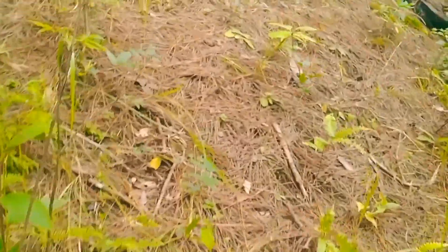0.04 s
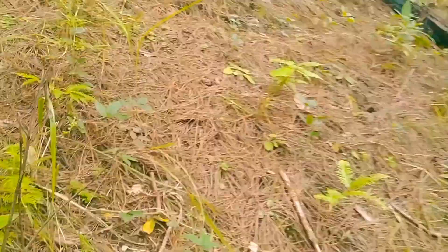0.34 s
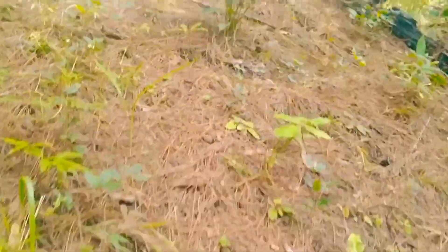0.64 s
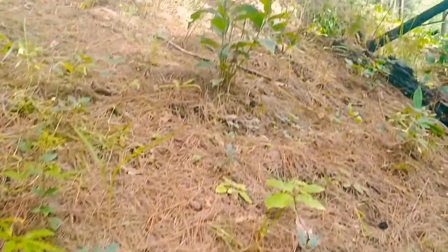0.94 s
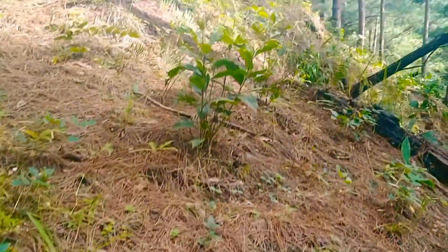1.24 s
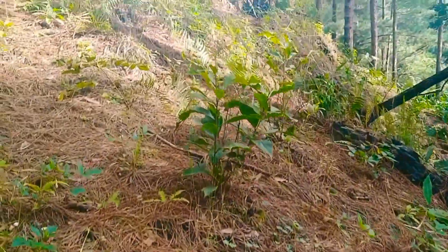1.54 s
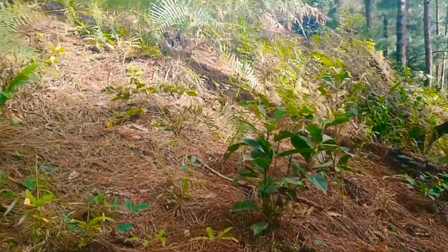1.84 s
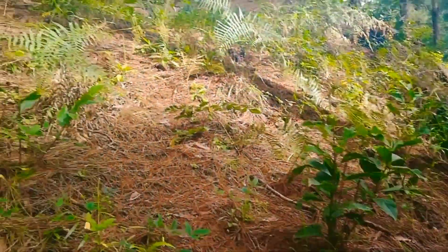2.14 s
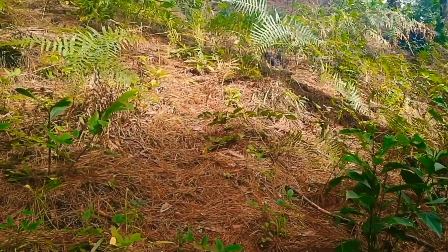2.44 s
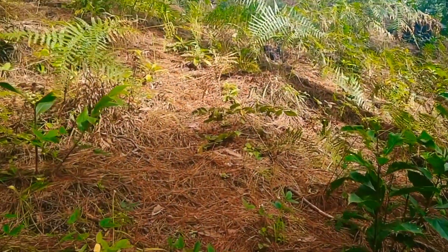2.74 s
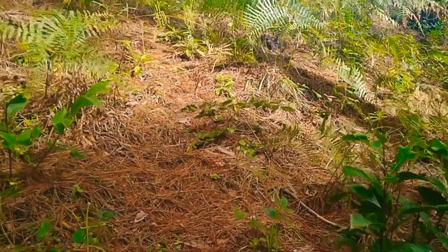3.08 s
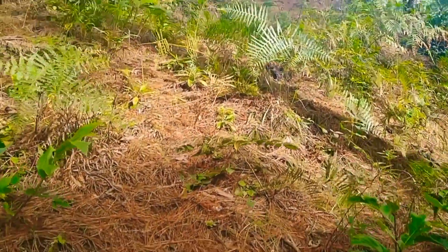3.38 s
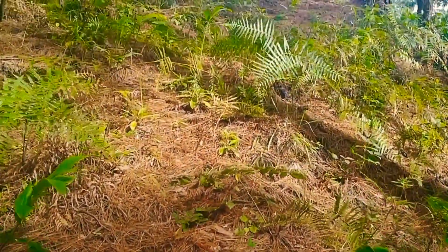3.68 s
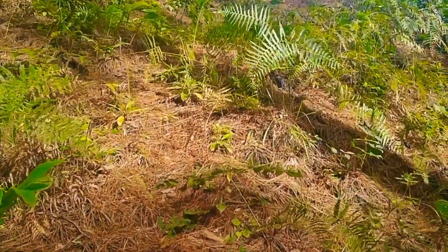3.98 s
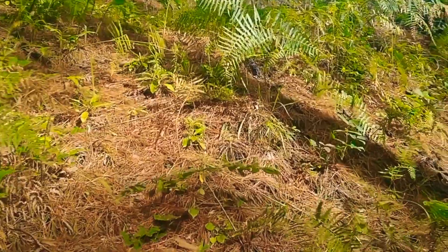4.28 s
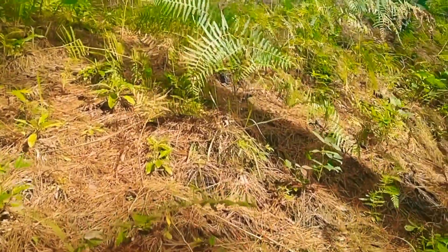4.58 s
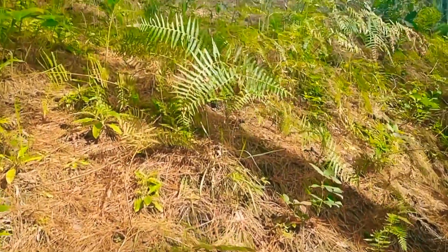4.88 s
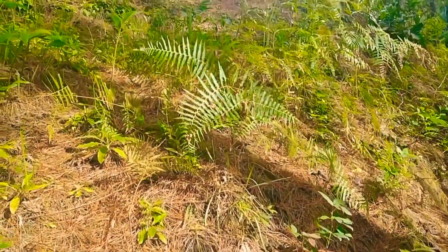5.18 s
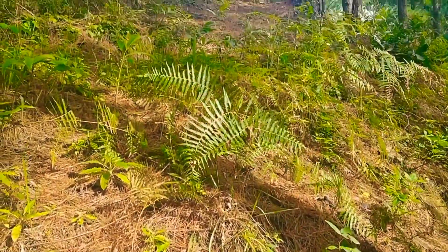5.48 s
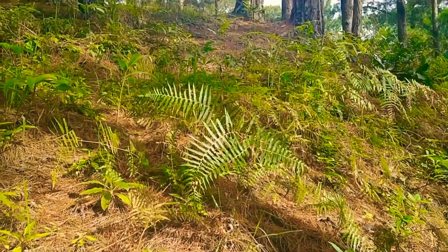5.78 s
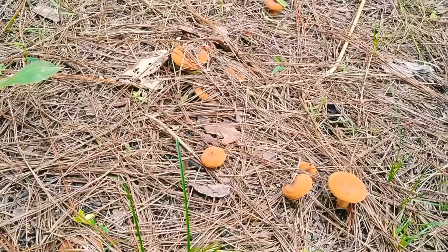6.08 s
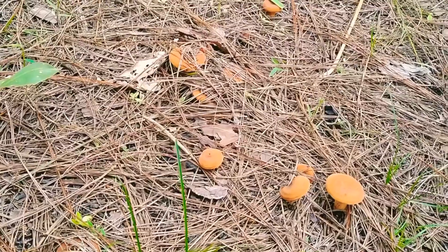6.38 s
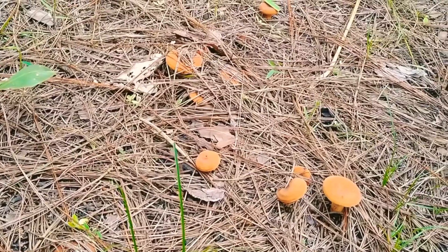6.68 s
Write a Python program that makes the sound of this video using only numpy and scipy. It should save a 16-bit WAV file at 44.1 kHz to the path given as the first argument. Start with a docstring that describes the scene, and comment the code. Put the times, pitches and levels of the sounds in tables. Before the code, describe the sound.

On a forest slope, a steady rush of wind fills the trees and rumbles against a handheld microphone, swelling in a couple of gusts. Twigs crack lightly and dry needles scrape nearby early on, with another tick midway. Near the end the sound breaks off into brief silence, then returns very softly as gentle air, a thin insect buzz, tiny bird chips and one distant note.

```python
"""Wind on a pine hillside, on a phone carried slowly through the undergrowth.
Needles brush past close by. Gusts rise quickly and die away slowly, driving the rush and hiss of the
crowns overhead and the rumble at the microphone. Twigs tick, the wind holds hollow notes, and thin
whistles arch far up in pitch. Near 5.8 s the sound breaks off; after a short silence comes a sheltered
spot with light puffs of air, insects, bird chips and one far-off note."""
import sys
import numpy as np
from scipy import signal
from scipy.fft import rfft, irfft, next_fast_len
from scipy.io import wavfile
from scipy.ndimage import uniform_filter1d

SR = 44100
rng = np.random.default_rng(int(sys.argv[2]) if len(sys.argv) > 2 else 0)


def store_pcm(level_fs):
    """Save levels as 16-bit WAV."""
    pcm = np.round(np.clip(level_fs, -1, 1) * 32767).astype(np.int16)
    wavfile.write(sys.argv[1], SR, np.atleast_2d(pcm).T)


N = 305162
TIME = np.arange(N) / SR


def undb(db):
    """Decibels to gain."""
    return 10 ** (np.asarray(db) / 20)


def unit(x):
    """Scale to rms 1."""
    return x / np.sqrt(np.mean(x ** 2) + 1e-18)


def noise():
    """White noise."""
    return rng.standard_normal(N)


def colour(x, spectrum):
    """Shape x by (freq_hz, level_db) points, falling 20 dB an octave beyond their ends; rms 1."""
    hz, db = np.transpose(spectrum)
    size = next_fast_len(N)
    octave = np.log2(np.maximum(np.fft.rfftfreq(size, 1 / SR), 1))
    beyond = np.abs(octave - np.clip(octave, np.log2(hz[0]), np.log2(hz[-1])))
    gain = undb(np.interp(octave, np.log2(hz), db) - 20 * beyond)
    return unit(irfft(rfft(x, size) * gain, size)[:N])


def walk(rate_hz):
    """A smooth random drift with about rate_hz turns a second; rms 1."""
    hold = max(int(SR / rate_hz), 2)
    steps = np.repeat(rng.standard_normal(N // hold + 1), hold)
    return unit(uniform_filter1d(uniform_filter1d(steps, hold), hold)[:N])


def grains(rate_hz, spread_db):
    """Random tiny impacts of uneven size; rms 1."""
    return unit((rng.random(N) < rate_hz / SR) * noise() * undb(spread_db * noise()))


def narrow(hz, width_hz):
    """Noise in a resonance; rms 1."""
    lowpass = signal.butter(2, width_hz / 2, fs=SR, output="sos")
    sway = signal.sosfilt(lowpass, noise() + 1j * noise())
    return unit(np.real(sway * np.exp(2j * np.pi * hz * TIME)))


def held(start_s, length_s, attack_s, release_s):
    """An envelope that rises to 1, holds, then dies away."""
    rise = np.clip((TIME - start_s) / attack_s, 0, 1)
    return rise * np.exp(-np.maximum(TIME - start_s - length_s, 0) / release_s)


def swell(centre_s, half_width_s):
    """A bell-shaped envelope."""
    return np.exp(-2 * ((TIME - centre_s) / half_width_s) ** 2)


def arch(start_s, length_s, top_hz, sweep, skew=1, waver_hz=0):
    """A tone that climbs and drops by the share sweep of its top pitch; skew over 1 delays the top."""
    progress = np.clip((TIME - start_s) / length_s, 0, 1)
    hz = top_hz * (1 - sweep * (2 * progress ** skew - 1) ** 2) + waver_hz
    envelope = (4 * progress * (1 - progress)) ** 0.262
    return envelope * np.sin(2 * np.pi * np.cumsum(hz) / SR)


def far_bird(width_hz=110):
    """One soft note from far off, blurred by its way through the trees."""
    # the note: centre_s, half_width_s, pitch_hz, level_db
    notes = [(6.775, .04, 2480, -70)]
    return sum(narrow(hz, width_hz) * undb(db) * np.exp(-2 * ((TIME - s) / half_width) ** 4)
               for s, half_width, hz, db in notes)


def insects(level_db):
    """Insects: a thin, flickering band near 5.8 kHz."""
    # insect spectrum: freq_hz, level_db
    spectrum = [(4800, -35), (5450, -9), (5750, 0), (5880, -5), (6050, -4), (6300, -17), (7000, -35)]
    return colour(noise(), spectrum) * undb(level_db + 1.5 * walk(120))


def bird(echo_t60_s=0.18, echo_db=-2):
    """Each chip arches up and drops faster than it rose; the trunks scatter it."""
    # bird chips: start_s, length_s, top_hz, level_db
    chips = [(6.363, .028, 9100, -70), (6.386, 0.024, 9050, -63), (6.462, .026, 9100, -64),
             (6.644, .028, 8900, -72), (6.743, 0.027, 8950, -69), (6.89, .026, 8950, -62)]
    song = sum(undb(db) * arch(s, length, hz, sweep=.3, skew=1.4) for s, length, hz, db in chips)
    t = TIME[:SR // 2]
    scatter = rng.standard_normal(len(t)) * np.exp(-np.log(1000) * t / echo_t60_s)
    echo = signal.fftconvolve(song, scatter / np.linalg.norm(scatter))[:N]
    return song + undb(echo_db) * echo


def eddies(level_db, spectrum, flutter_db):
    """Air tumbles over the microphone port; each eddy is a short swell of rumble."""
    return colour(noise(), spectrum) * undb(level_db + flutter_db * walk(22.04))


def shelter():
    """Near the ground the air comes in light puffs, and insects and birds come through."""
    # puffs of air: start_s, length_s, strength_db
    puffs = [(6.33, 0.2, 2), (6.41, 0.12, 1.5), (6.728, 0.064, 2.3)]
    # spectra of light air on the microphone and of the rustle around it: freq_hz, level_db
    eddy_spectrum = [(25, -39), (50, -38), (78, -18), (102, -1.5), (135, 0.5), (180, -5), (300, -15.5),
                     (450, -22), (1000, -42)]
    rustle_spectrum = [(200, -10), (480, 1), (700, -2), (950, 1), (1700, 0.5), (2600, -1.5), (3400, -8),
                       (4200, -13.5), (5200, -13), (7500, -11.5), (8900, -15), (10200, -20), (12000, -26),
                       (15600, -19)]
    puff_db = sum(db * held(s, length, attack_s=.03, release_s=.034) for s, length, db in puffs)
    rumble = eddies(-60 + 0.92 * puff_db, eddy_spectrum, flutter_db=2.0)
    grainy_air = noise() + undb(-6) * grains(rate_hz=900, spread_db=2.5)
    rustle = colour(grainy_air, rustle_spectrum) * undb(-65 + puff_db)
    return rumble + rustle + insects(-76 + 1.7 * puff_db) + bird() + far_bird()


def high_tones(gust_db, waver_hz=210, flicker_db=3):
    """Thin unsteady whistles at the top of the range, and a sizzle that grows in a gust."""
    # arching whistles: start_s, length_s, top_hz, level_db
    arches = [(3.5, .07, 13200, -64), (3.58, .11, 14500, -66), (3.76, .26, 14900, -57),
              (4.94, 0.13, 13900, -60.5)]
    # spells of sizzle: start_s, length_s, relative_db
    spells = [(.8, 6.5, 0), (3.5, 0.47, -2.5), (4.177, .34, 4.5)]
    waver = waver_hz * walk(300)
    whistles = sum(undb(db) * arch(s, length, hz, sweep=.095, waver_hz=waver)
                   for s, length, hz, db in arches)
    envelope = sum(undb(db) * held(s, length, attack_s=.04, release_s=.17) for s, length, db in spells)
    sizzle = narrow(hz=13700, width_hz=4200) * envelope * undb(-64.5 + 1.3 * gust_db)
    return whistles * undb(flicker_db * walk(70)) + sizzle


def hollow(gust_db, fade_s=0.14):
    """The wind sings broad notes, louder in a gust."""
    # hollow notes: start_s, length_s, centre_hz, width_hz, base_level_db
    notes = [(0, .6, 2857, 1100, -55.5), (0.684, .65, 1807, 400, -50), (3.0, .9, 1810, 330, -54),
             (4.197, .6, 1496, 260, -49), (4.9, .9, 1594, 350, -53.5)]
    song = sum(narrow(hz, width_hz) * undb(db) * held(s, length, fade_s, fade_s)
               for s, length, hz, width_hz, db in notes)
    return song * undb(.9 * gust_db)


def undergrowth(crack_decay_s=0.00077, crack_db=-7):
    """Close to the phone, dry needles scrape past; twigs crack and ring briefly."""
    # needles brushed in passing: centre_s, half_width_s, level_db
    brushes = [(0.03, .04, -49), (0.897, .025, -48), (0.942, .045, -52), (5.024, .08, -54.5)]
    # dry twigs: start_s, ring_hz, t60_s, level_db
    twigs = [(.8873, 3600, 0.0096, -36.5), (0.895, 2920, 0.011, -35), (.9020, 2740, 0.014, -31.5),
             (.9145, 2670, .015, -35), (.9335, 3520, 0.046, -37), (3.438, 685, .07, -33)]
    # spectrum of scrapes and cracks: freq_hz, level_db
    spectrum = [(700, -9), (2000, -1), (3400, 3), (4500, -9), (7000, -4), (8600, -3.5),
                (11500, -13), (15500, -4.5)]
    pressure = sum(undb(db) * swell(s, half_width) for s, half_width, db in brushes)
    out = pressure * colour(grains(rate_hz=5300, spread_db=2.0), spectrum)
    crack = undb(crack_db) * colour(noise(), spectrum)
    for s, hz, t60, db in twigs:
        t = np.maximum(TIME - s, 0)
        ring = np.sin(2 * np.pi * hz * t) * np.exp(-np.log(1000) * t / t60)
        out += undb(db) * (t > 0) * (ring + crack * np.exp(-t / crack_decay_s))
    return out


def buffets(below_db=-20.5, above_db=-16):
    """Single large eddies hit the microphone; each swells and fades as a low, hollow thump."""
    # thumps: centre_s, half_width_s, centre_hz, level_db
    thumps = [(.05, 0.068, 190, -45), (.34, 0.082, 140, -43.5), (.92, 0.048, 223, -38),
              (1.09, 0.089, 234, -42.5), (1.38, 0.11, 260, -41), (2.098, 0.073, 155, -37.5),
              (3.36, 0.17, 145, -44), (3.8, 0.13, 150, -49), (4.2, .05, 150, -43.5), (4.56, .1, 160, -46),
              (5.0, 0.054, 300, -41), (5.11, 0.064, 140, -42.5)]
    out = np.zeros(N)
    for s, half_width, hz, db in thumps:
        spectrum = [(hz / 2, below_db), (hz, 0), (hz * 2, above_db)]
        out += colour(noise(), spectrum) * undb(db) * swell(s, half_width)
    return out


def crowns(gust_db, rush_db=-41.5, hiss_db=-52.5):
    """Overhead, needles shed vortices: three trees swell on their own, and dry needles tap in the hiss."""
    # spectra of the rush and the hiss: freq_hz, level_db
    rush_spectrum = [(100, -26), (250, -4.5), (420, 0.5), (680, 0.5), (900, -2), (1200, -2), (1600, -1),
                     (2000, -3), (2400, -7.5), (2800, -12.5), (3400, -15.5), (4100, -21), (7000, -47.5)]
    hiss_spectrum = [(2500, -17.5), (4200, -10), (4700, -3), (7000, -3.5), (7600, -1), (8100, -1),
                     (8450, 2), (9200, -3.5), (10000, -7), (11500, -11), (13000, -11.5), (15600, -1)]
    flutter_db = 0.41 * walk(18)
    trees = sum(noise() * undb(0.4 * walk(4.25)) for _ in range(3))
    rush = colour(trees, rush_spectrum) * undb(rush_db)
    needles = noise() + undb(-11) * grains(rate_hz=1500, spread_db=7.5)
    hiss = colour(needles, hiss_spectrum) * undb(hiss_db)
    return (rush + hiss) * undb(gust_db + flutter_db)


def hillside():
    """The open slope: rumble, crowns, hollow notes and sizzle follow the same gusts."""
    # gusts: start_s, rise_s, decay_s, strength_db
    gusts = [(.83, .13, 1.1, 2.5), (1.32, 0.16, .8, 1), (4.93, 0.084, 0.79, 3.5)]
    # spectrum of wind on the microphone: freq_hz, level_db
    eddy_spectrum = [(25, -41.5), (50, -33), (78, -19), (100, -7), (125, -3), (155, 0.5), (185, -4.5),
                     (240, -5.5), (350, -11), (600, -25.5), (1500, -45.5)]
    gust_db = sum(db * held(s, rise, rise, decay) for s, rise, decay, db in gusts)
    rumble = eddies(-44 + 0.47 * gust_db, eddy_spectrum, flutter_db=1.0)
    return rumble + buffets() + crowns(gust_db) + hollow(gust_db) + high_tones(gust_db) + undergrowth()


def scene(wind_end_s=5.7745, shelter_start_s=6.358):
    """The slope, a sudden silence, then the sheltered spot; mono."""
    on_slope = np.clip((wind_end_s - TIME) / 0.00088, 0, 1)
    in_shelter = np.clip((TIME - shelter_start_s) / 0.017, 0, 1) ** 3
    return (on_slope * hillside() + in_shelter * shelter())[None]


def record(dry):
    """The phone cuts steeply above 15.75 kHz."""
    return signal.sosfilt(signal.ellip(12, .2, 70, 15750, fs=SR, output="sos"), dry)


dry = scene()
out = record(dry)
store_pcm(out)
```